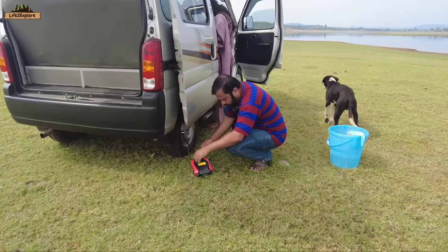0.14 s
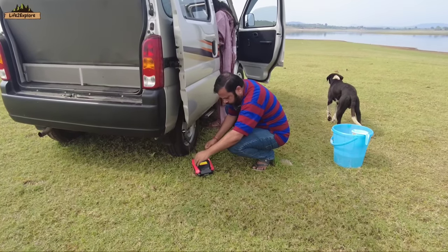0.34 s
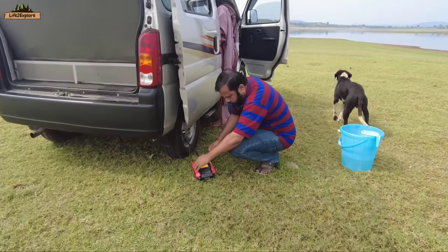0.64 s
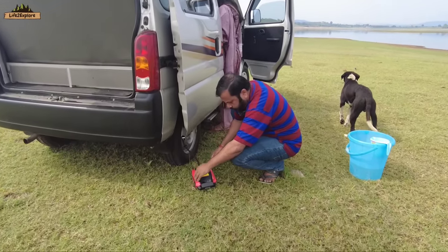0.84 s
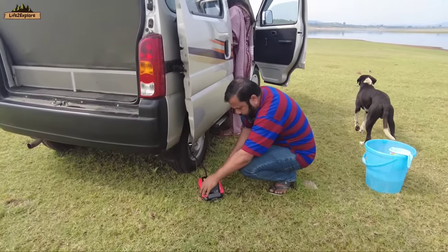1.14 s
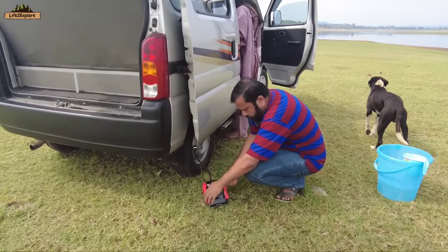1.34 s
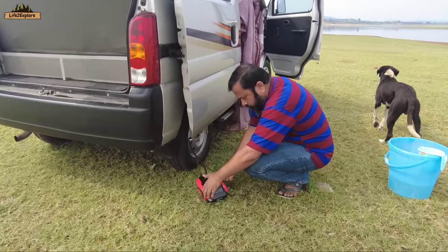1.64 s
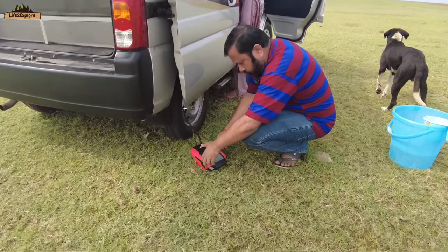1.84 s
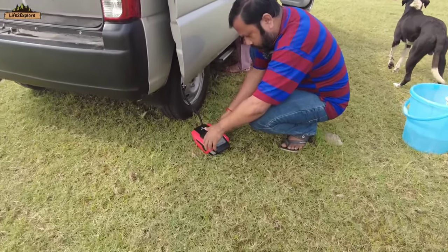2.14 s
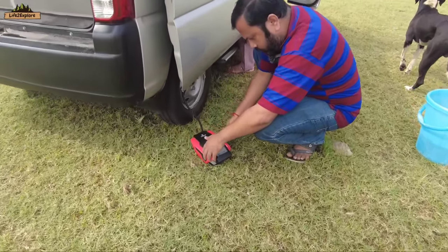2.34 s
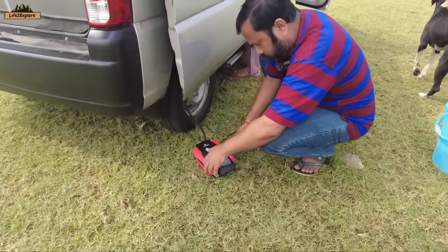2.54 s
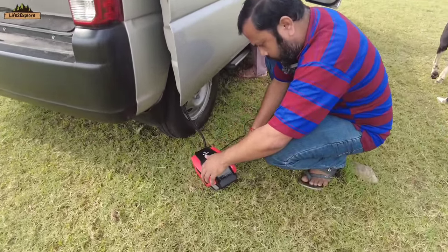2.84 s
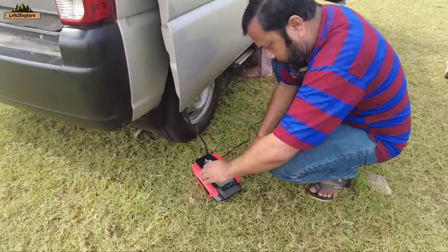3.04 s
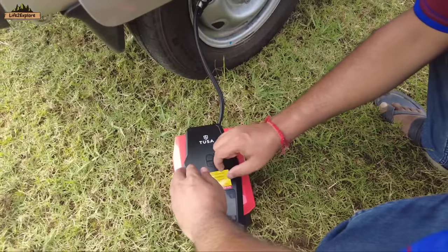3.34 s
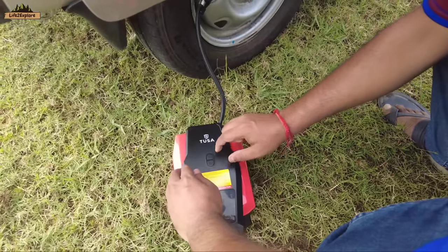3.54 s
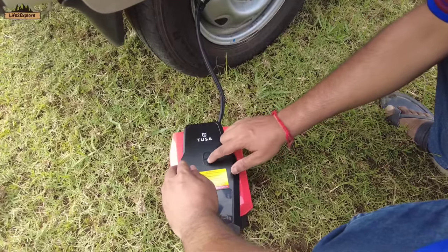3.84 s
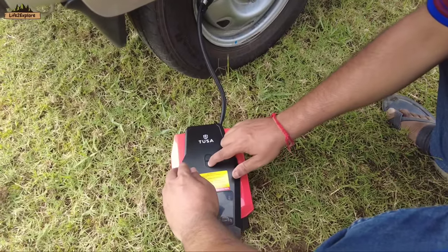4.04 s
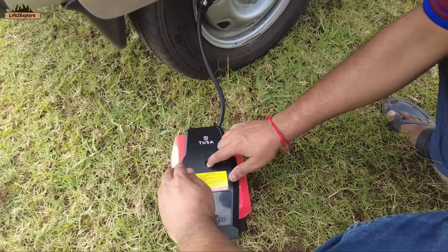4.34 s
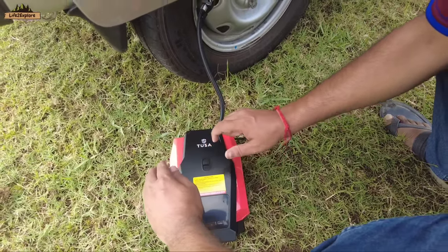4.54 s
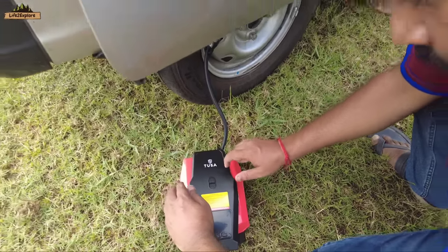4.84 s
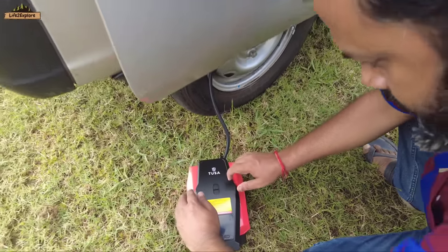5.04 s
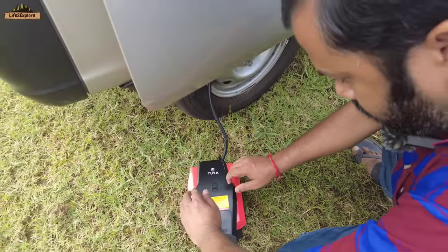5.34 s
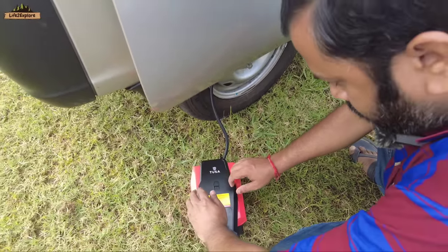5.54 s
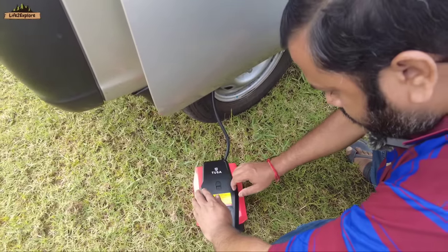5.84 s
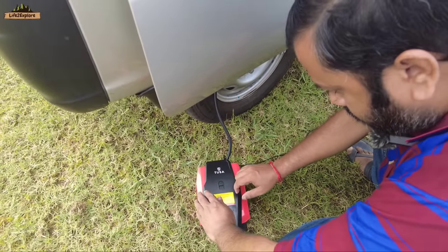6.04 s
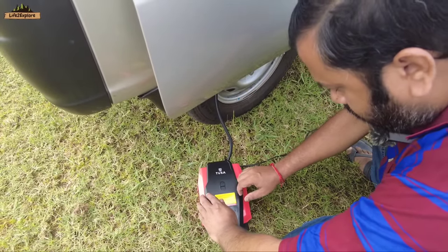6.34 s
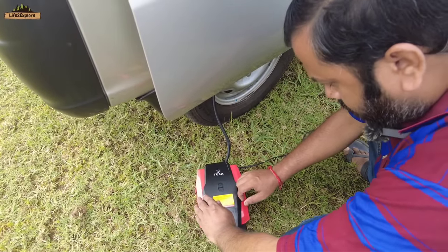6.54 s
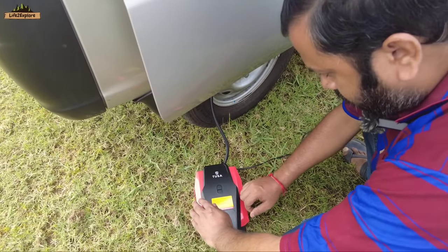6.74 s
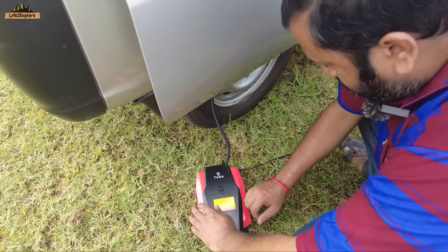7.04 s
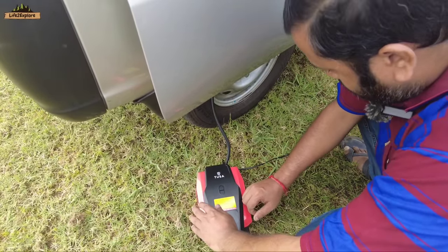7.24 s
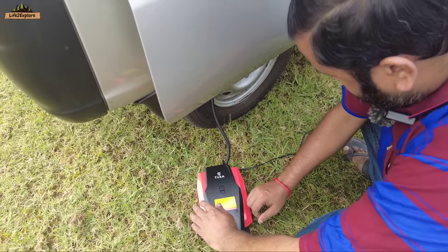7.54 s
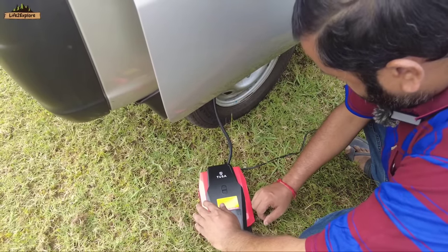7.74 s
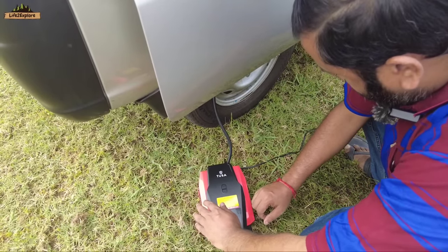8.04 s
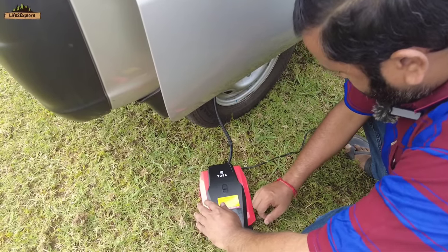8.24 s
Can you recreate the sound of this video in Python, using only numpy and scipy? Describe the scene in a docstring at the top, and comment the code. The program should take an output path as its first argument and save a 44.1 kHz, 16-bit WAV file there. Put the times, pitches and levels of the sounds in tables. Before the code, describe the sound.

Low, steady van idle with faint bird chirps and a grass rustle, until a portable air compressor knocks, spins up and drones harshly beside the wheel.

```python
"""A small piston inflator is switched on beside the rear wheel of a van: its motor drives the crank through an 11:49 gear,
the plastic case hums, and valve air and gear chatter puff once a stroke.
The van idles on open grass, first a few metres off, then close after a short dissolve: exhaust partials over bay noise.
Behind it, a hand rustles in the grass as noise grains and snaps, and faint birds chirp as gliding whistles."""
import sys
import numpy as np
from scipy import signal
from scipy.fft import rfft, irfft, next_fast_len
from scipy.io import wavfile
from scipy.ndimage import uniform_filter1d

SR = 44100
rng = np.random.default_rng(int(sys.argv[2]) if len(sys.argv) > 2 else 0)


def persist_wave(psi):
    """Save psi, clipped to +-1, as 16-bit WAV."""
    counts = np.round(np.clip(psi, -1, 1) * 32767).astype(np.int16)
    wavfile.write(sys.argv[1], SR, np.atleast_2d(counts).T)


N = 370110
T = np.arange(N) / SR  # seconds

# Distant chirps. Each row: start in seconds, length in seconds, first Hz, last Hz, peak dB before the flutter.
BIRD_CHIRPS = [(.275, .04, 4700, 4250, -71), (.305, .06, 4350, 5300, -74), (.36, .075, 5200, 4100, -73),
               (1.14, .035, 5700, 4700, -74), (2.88, .07, 4650, 5150, -76), (2.95, .08, 5250, 4700, -76),
               (3.06, .045, 5750, 5550, -74), (3.1, .05, 5200, 4250, -73)]
# Dry snaps in the grass. Each row: start in seconds, peak dB.
GRASS_SNAPS = [(1.73, -59), (1.757, -47), (1.806, -64), (1.86, -66), (1.933, -56), (1.95, -59), (3.11, -63)]

# Van engine at each place. Each row: time in seconds, firing rate in Hz, exhaust level in dB.
FAR_ENGINE = [(0, 41.3, -33), (.6, 41.05, -32.5), (1.4, 40.8, -32.5), (2.2, 40.85, -32.3),
              (2.6, 40.6, -31.6), (3.3, 40.4, -31.3)]
NEAR_ENGINE = [(3.3, 39.4, -29), (3.8, 39.27, -29), (4.2, 39.28, -28.7), (4.6, 38.85, -28.6),
               (5, 38.9, -28.6), (5.4, 38.63, -28.7), (8.39, 38.6, -28.6)]
# Exhaust partials at each place. Each row: multiple of the firing rate, dB relative to the exhaust level.
FAR_EXHAUST = [(.5, -16), (1, 0), (2, -25), (3, -15), (3.5, -33), (4, -27), (5, -19), (5.5, -28), (6, -23),
               (7, -32), (10, -32)]
NEAR_EXHAUST = [(.5, -22), (1, 0), (2, -23), (3, -21), (3.5, -35), (5, -26), (5.5, -30), (6, -33), (7, -31)]
# Spectrum of engine bay rumble and clatter at each place. Each row: Hz, relative dB per Hz.
FAR_BAY_SPECTRUM = [(53, -40), (90, -8.5), (130, -14.5), (165, -14.5), (218, -5.5), (328, -10.5),
                    (515, -12.5), (667, -11), (1000, -23), (1120, -15.5), (1480, -29), (2430, -26),
                    (5880, -42), (13000, -52), (15500, -60)]
NEAR_BAY_SPECTRUM = [(53, -19), (90, -7), (127, -20), (161, -9.5), (213, -2), (328, -8.5), (494, -13),
                     (626, -12), (963, -20.5), (1190, -18), (1450, -25), (3900, -34), (15500, -61.5)]
# Rings of the engine bay. Each row: centre in Hz, width in Hz, mean level in dB, start and end in seconds.
BAY_RESONANCES = [(585, 34, -58.5, 1.5, 9), (1323, 150, -67, -7, 3.43), (1623, 20, -73, -6, 3.5),
                  (2510, 200, -71.5, 3, 4.3), (2870, 160, -72.5, 1.5, 3.74), (7100, 610, -84, 2, 4.1),
                  (13100, 200, -89, -2, 3.4)]
# Thin whines from the engine bay. Each row: mean Hz, level in dB before it wavers, start and end in seconds.
BAY_TONES = [(410, -68, -1, 3.3), (625, -66, 3.3, 9), (740, -68, -1, 3.3), (1098, -67.5, -1, 3.5),
             (6553, -87, .8, 3.5)]
FAR_BAY_DB, NEAR_BAY_DB = -50, -49
DISSOLVE_START_S, DISSOLVE_END_S = 3.22, 3.41
TAPPET_S, TAPPET_HZ, TAPPET_DB = 2.713, 7190, -84  # time of one tick, centre, mean level

# Crank partials. Each row: multiple of the stroke rate, dB relative to the tone level.
CRANK_PARTIALS = [(1, -47), (2, -45), (3, -40), (4, -39), (5, -42), (6, -40), (8, -48.5), (9, -37.5),
                  (10, -50.5), (11, -46.5), (12, -40), (13, -42), (14, -44), (15, -45.5), (16, -53),
                  (17, -48.5), (18, -50), (19, -54), (20, -82), (21, -57), (22, -82), (23, -59),
                  (24, -60.5)]
# Motor partials. Each row: multiple of the motor speed, shift in strokes, dB relative to the tone level.
MOTOR_PARTIALS = [(1, 0, -46), (1, 1, -44), (1, 2, -43), (1, 3, -49), (1, 6, -47), (1, 7, -48), (1, 8, -43),
                  (1, 10, -49), (2, -2, -47), (2, -1, -50), (2, 2, -50), (2, 3, -48), (2, 4, -49),
                  (3, -6, -48), (3, -1, -48), (3, 0, -39), (3, 1, -48), (8, -1, -62), (8, 0, -59),
                  (12, -2, -56), (12, -1, -55), (12, 1, -58)]
# Broad spectrum of air in the case. Each row: Hz, relative dB per Hz.
CASE_SPECTRUM = [(76, -47), (130, -20.5), (340, -18.5), (391, -2), (449, -3.5), (497, -11), (549, -7),
                 (741, -7), (1300, -12.5), (1430, -21), (2670, -19), (2890, -19), (3600, -22), (9400, -29),
                 (15500, -43.5)]
# Rings of the case, each sounding for its own span.
# Each row: centre in Hz, width in Hz, dB relative to the air level, start and end in seconds.
CASE_RESONANCES = [(1032, 70, -4, 3.6, 5.4), (960, 240, -11.5, 5.94, 9), (1280, 34, -19.5, 5.7, 9),
                   (2020, 130, -18.5, 4.44, 9), (2560, 340, -12, 6.94, 9), (2950, 400, -9.5, 4.47, 9),
                   (3470, 310, -10.5, 6.86, 9), (4520, 290, -19, 4.4, 6.3), (4920, 230, -17, 3.3, 5.5),
                   (5140, 170, -15.5, 6.8, 9), (5940, 200, -10.5, 4.67, 6.84),
                   (7950, 300, -16.5, 4.3, 6.23), (7720, 170, -26, 6.6, 9), (9380, 570, -20, 5.54, 9),
                   (10100, 750, -31, 6.1, 9), (10600, 750, -31, 3.6, 7.1), (13500, 450, -23, 4.4, 5.7),
                   (14200, 700, -28, 4.9, 9)]
# First piston knocks. Each row: start in seconds, peak dB, Hz within the band.
PISTON_KNOCKS = [(4.312, -29.5, 880), (4.322, -31, 496), (4.338, -25, 980), (4.345, -35, 3040),
                 (4.374, -32.5, 920)]
# Clicks of the switch and its relay. Each row: start in seconds, peak dB.
SWITCH_CLICKS = [(4.312, -35), (4.344, -40)]

GEAR = 49 / 11  # motor turns per stroke
# inflator speed in strokes per second
SWITCH_S, FREE_RATE, SAG_PER_S = 4.312, 57.92, .431
SPIN_UP_RATE, SPIN_UP_S, WARM_RATE, WARM_S = 43, .058, 3.91, 1.585
# levels at top speed, and their loss for each halving of it
AIR_DB, AIR_DB_PER_HALVING = -38, 7
TONE_DB, TONE_DB_PER_HALVING, TONE_DB_PER_S = -1, 11, .5
# narrow case resonance, and the 7th partial's level away from it
HUM_HZ, HUM_WIDTH_HZ, HUM_DB, HUM_OFF_DB = 394, 7, -31, -40
THROB_S, THROB_DB = 4.96, -42.5  # a moment when the throb tone opposes the hum
PUFF_S = 6.0375  # one compression peak; the others follow by the crank angle
TOP_HZ = 15450  # upper edge of the microphone signal


def undb(db):
    """Decibels to gain."""
    return 10 ** (np.asarray(db) / 20)


def read(table):
    """Columns of a timed table as curves, one value a sample."""
    s, *columns = np.transpose(table)
    return [np.interp(T, s, column) for column in columns]


def ramp(span):
    """0 before the span, 1 after it."""
    return np.interp(T, span, (0, 1))


def walk(rate):
    """Random levels held for 1 / rate seconds and smoothed twice; spread near 1."""
    steps = np.repeat(rng.standard_normal(int(rate * N / SR) + 2), repeats=8)
    steps = uniform_filter1d(uniform_filter1d(steps, size=8), size=8)
    return 1.08 * np.interp(T, np.arange(len(steps)) / (8 * rate), steps)


def sine(turns):
    """A sine of peak 1 from its count of cycles."""
    return np.sin(2 * np.pi * turns)


def colour(x, spectrum):
    """Shape by a broad spectrum, straight in dB over log frequency; rms 1."""
    size = next_fast_len(N)
    hz = np.maximum(np.arange(size // 2 + 1) * SR / size, 1)
    point_hz, point_db = np.transpose(spectrum)
    gain = undb(np.interp(np.log(hz), np.log(point_hz), point_db))
    y = irfft(rfft(x, size) * gain, size)[:N]
    return y / np.std(y)


def burst(s, peak_db, lo_hz, hi_hz, t60):
    """A short crack of noise in one band; its drive decays 60 dB in t60 seconds."""
    out, i, n = np.zeros(N), int(s * SR), np.arange(2000)
    band = signal.butter(2, (lo_hz, min(hi_hz, .45 * SR)), "bandpass", fs=SR, output="sos")
    crack = signal.sosfilt(band, rng.standard_normal(len(n)) * undb(-60 * n / SR / t60))
    out[i:i + len(n)] = crack / np.max(np.abs(crack)) * undb(peak_db)
    return out


def ring(x, rings, fade_s, drift, waver_db):
    """Resonances whose centre drifts and whose level wavers; each sounds for its own span."""
    out = np.zeros(N)
    for hz, width, db, start, end in rings:
        span = slice(int(max(start - fade_s, 0) * SR), int((end + fade_s) * SR))
        fade = min(fade_s, (end - start) / 4)
        spin = np.exp(2j * np.pi * np.cumsum(hz * (1 + drift * walk(3.02)[span])) / SR)
        # shift the centre to 0 Hz, smooth with a double pole, shift back
        pole = np.exp(-1.55 * np.pi * width / SR)  # 1.55 gives the half-power width
        y = (signal.lfilter([1], [1, -2 * pole, pole ** 2], x[span] / spin) * spin).real
        on = np.interp(T[span], (start - fade, start + fade, end - fade, end + fade), (0, 1, 1, 0))
        out[span] += on * undb(db + waver_db * walk(7)[span]) * y / np.std(y)
    return out


def swell(peak_s, rise_db_per_s, fall_db_per_s, peak_db, hold_s):
    """A level in dB that climbs to its peak, holds and falls away."""
    rise = rise_db_per_s * np.maximum(peak_s - T, 0)
    fall = fall_db_per_s * np.maximum(T - peak_s - hold_s, 0)
    return peak_db - rise - fall


def birds():
    """Thin gliding whistles that flutter with distance."""
    out = np.zeros(N)
    flutter = undb(2 + 3 * walk(60))
    quaver = 1 + .012 * walk(300)
    for s, length, from_hz, to_hz, db in BIRD_CHIRPS:
        along = np.clip((T - s) / length, 0, 1)
        hz = (from_hz + (to_hz - from_hz) * along) * quaver
        out += undb(db) * np.sin(np.pi * along) * sine(np.cumsum(hz) / SR)
    return out * flutter


def grass():
    """Uneven noise grains crackle under a moving hand, with a few snaps."""
    grains = rng.standard_normal(N) * undb(3 * walk(120))
    spectrum = [(3000, -29), (5500, -12), (10000, -15), (15000, -27)]  # Hz, relative dB
    level = swell(1.74, rise_db_per_s=50, fall_db_per_s=130, peak_db=-70.5, hold_s=.2)
    snaps = sum(burst(s, db, 3600, 12000, .027) for s, db in GRASS_SNAPS)
    return undb(level) * colour(grains, spectrum) + snaps


def bay_whines():
    """Belt-driven parts sing faint tones that wander a little."""
    out = np.zeros(N)
    for hz, db, start, end in BAY_TONES:
        on = ramp((start - .1, start + .1)) - ramp((end - .1, end + .1))
        turns = np.cumsum(hz * (1 + .003 * walk(20))) / SR
        out += on * undb(db + 3.5 * walk(25)) * sine(turns)
    return np.sqrt(2) * out


def exhaust(turns, level_db, partials):
    """Pulses of burnt gas as partials of the firing rate, whose levels waver a little."""
    out = np.zeros(N)
    for k, db in partials:
        waver_db = min(.4 * (k - 1) ** 2, 1.5)
        out += undb(db + waver_db * walk(12)) * np.sin(2 * np.pi * k * turns + np.pi / 5 * (k - 1))
    return np.sqrt(2) * undb(level_db) * out


def engine_bay(turns, spectrum, level_db):
    """Rumble and clatter: broad noise that swells with each firing."""
    swing_db = .43 * np.cos(2 * np.pi * turns) + .44 * np.cos(4 * np.pi * turns)
    swing_db += .43 * np.cos(np.pi * turns) + .34 * walk(4.1)
    return undb(level_db) * colour(undb(swing_db) * rng.standard_normal(N), spectrum)


def tappet(turns):
    """One valve ticks once in four firings, as decaying noise through a resonance."""
    cycle = (turns - turns[int(TAPPET_S * SR)]) / 4 % 1
    tick = np.exp(-cycle / .04) * rng.standard_normal(N)
    return ring(tick, [(TAPPET_HZ, 600, TAPPET_DB, 2.5, 3.7)], .3, .003, 1.5)


def van():
    """Two places dissolve into each other; the firing tones meet in opposite phase midway and partly cancel."""
    far_hz, far_db = read(FAR_ENGINE)
    near_hz, near_db = read(NEAR_ENGINE)
    far_turns, near_turns = np.cumsum(far_hz) / SR, np.cumsum(near_hz) / SR
    middle = int((DISSOLVE_START_S + DISSOLVE_END_S) / 2 * SR)
    near_turns += far_turns[middle] - near_turns[middle] + .5
    far = exhaust(far_turns, far_db, FAR_EXHAUST) + tappet(far_turns)
    far += engine_bay(far_turns, FAR_BAY_SPECTRUM, FAR_BAY_DB)
    near = exhaust(near_turns, near_db, NEAR_EXHAUST) + tappet(near_turns)
    near += engine_bay(near_turns, NEAR_BAY_SPECTRUM, NEAR_BAY_DB)
    mix = ramp((DISSOLVE_START_S, DISSOLVE_END_S))
    rings = ring(rng.standard_normal(N), BAY_RESONANCES, .15, .002, 1.2)
    return (1 - mix) * far + mix * near + rings + bay_whines()


def stroke_rate(on_s):
    """Quick spin-up, slow loosening as the inflator warms, and a sag as the tyre pressure grows."""
    spin_up = SPIN_UP_RATE * np.exp(-on_s / SPIN_UP_S)
    warming = WARM_RATE * np.exp(-on_s / WARM_S)
    return FREE_RATE - spin_up - warming - SAG_PER_S * on_s


def crank_and_motor(turns):
    """Partials of the stroke rate, and of the motor speed shifted by whole strokes."""
    lines = list(CRANK_PARTIALS) + [(h * GEAR + k, db) for h, k, db in MOTOR_PARTIALS]
    return sum(undb(db + .59 * walk(8)) * sine(k * turns + rng.random()) for k, db in lines)


def starting_strain(turns):
    """The 2nd and 3rd motor partials swell, unsteadily, under the strain of the start."""
    level = swell(SWITCH_S + .085, rise_db_per_s=300, fall_db_per_s=150, peak_db=-38, hold_s=.14)
    motor = GEAR * turns
    return undb(level) * undb(3 * walk(35)) * (sine(2 * motor) + 1.5 * sine(3 * motor))


def case_hum(turns, rate, halvings):
    """The 7th partial swells near a case resonance; a tone just under it beats once in 22 strokes."""
    resonance = undb(HUM_DB) / np.hypot(1, 2 * (7 * rate - HUM_HZ) / HUM_WIDTH_HZ) ** 2
    gain = resonance + undb(HUM_OFF_DB - TONE_DB_PER_HALVING * halvings)
    since = turns - turns[int(THROB_S * SR)]
    return gain * sine(7 * since) - undb(THROB_DB) * sine((7 - 1 / 22) * since)


def compression(turns):
    """Crank angle and gear load: a quick rise, a slower fall, and no two strokes quite alike."""
    angle = turns - turns[int(PUFF_S * SR)] + 200  # keeps the stroke numbers positive
    strength = undb(1.1 * rng.standard_normal(400)[angle.astype(int)])
    puff = strength * np.exp(-(angle % 1) / .24)
    return angle, uniform_filter1d(puff, size=150)


def gear_whine(turns, load):
    """Tooth rate and its octave stand out while the motor speeds up, stressed by the load."""
    level = swell(SWITCH_S + .09, rise_db_per_s=500, fall_db_per_s=130, peak_db=-41, hold_s=.02)
    gain = undb(level) + undb(-68)  # a faint rest remains
    teeth = sine(49 * turns) + .9 * sine(98 * turns)
    return 4 * load ** 2 * undb(6.2 * walk(90)) * gain * teeth


def air_and_chatter(angle, load):
    """Valve air and gear chatter puff through the case; its low drone is steady."""
    # the same teeth meet at the same crank angle, so part of the chatter repeats every stroke
    pattern = rng.standard_normal(800)
    pattern = pattern - uniform_filter1d(pattern, size=20, mode="wrap")  # tooth contacts carry no bass
    teeth = np.interp(angle % 1, np.linspace(0, 1, 800), pattern)
    grind = .57 * teeth + rng.standard_normal(N)
    chatter = (.92 + load) * grind
    # steady noise replaces the chatter below the crossover
    cross = signal.butter(2, 1100, fs=SR, output="sos")
    steady = 1.01 * rng.standard_normal(N)
    air = colour(chatter + signal.sosfiltfilt(cross, steady - chatter), CASE_SPECTRUM)
    return undb(4) * air + ring((.2 + load) * grind, CASE_RESONANCES, .25, .0043, 1.6)


def inflator():
    """One crank speed drives tones, hum, whine and puffing air, with clicks and first piston knocks at the start."""
    on_s = np.maximum(T - SWITCH_S, 0)
    rate = stroke_rate(on_s)
    turns = np.cumsum(rate) / SR
    halvings = np.log2(rate.max() / rate)  # below top speed
    # tones grow as the pressure does
    tone_db = TONE_DB - TONE_DB_PER_HALVING * halvings + TONE_DB_PER_S * on_s
    air_db = AIR_DB - AIR_DB_PER_HALVING * halvings
    angle, load = compression(turns)
    tones = undb(tone_db) * crank_and_motor(turns)
    tones += case_hum(turns, rate, halvings) + starting_strain(turns)
    air = undb(air_db) * air_and_chatter(angle, load)
    running = np.sqrt(2) * tones + air + gear_whine(turns, load)
    knocks = sum(burst(s, db, hz / 1.32, hz * 1.14, .073) for s, db, hz in PISTON_KNOCKS)
    clicks = sum(burst(s, db, 4800, 16000, .029) for s, db in SWITCH_CLICKS)
    return ramp((SWITCH_S, 4.345)) * running + knocks + clicks


def scene():
    """Birds, grass, van and inflator summed at one microphone."""
    return (birds() + grass() + van() + inflator())[None]


def record(dry):
    """The microphone adds its own faint hiss; the top is cut steeply."""
    hiss = undb(-77.5) * rng.standard_normal(dry.shape)
    top_cut = signal.ellip(10, .2, 80, TOP_HZ, fs=SR, output="sos")
    return signal.sosfilt(top_cut, dry + hiss)


dry = scene()
out = record(dry)
persist_wave(out)
```